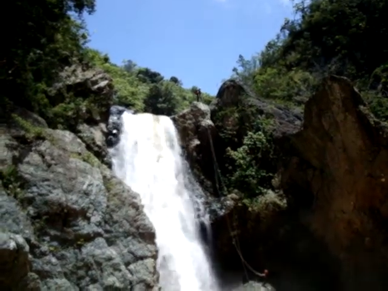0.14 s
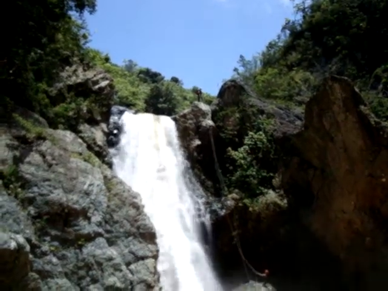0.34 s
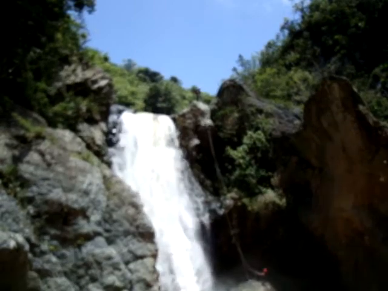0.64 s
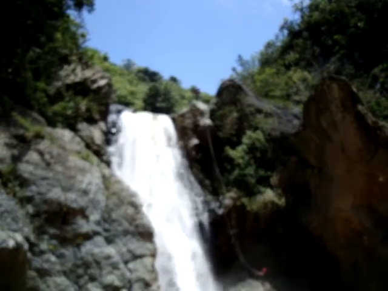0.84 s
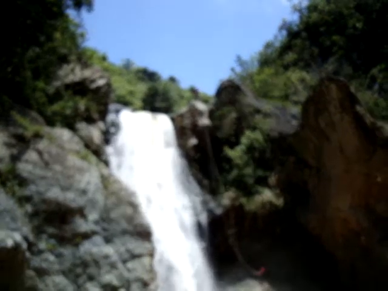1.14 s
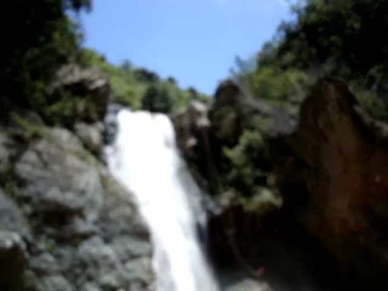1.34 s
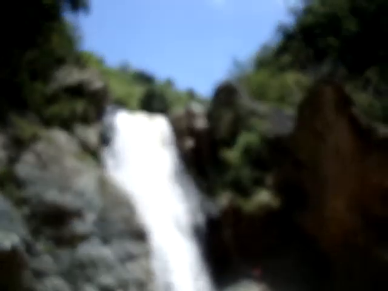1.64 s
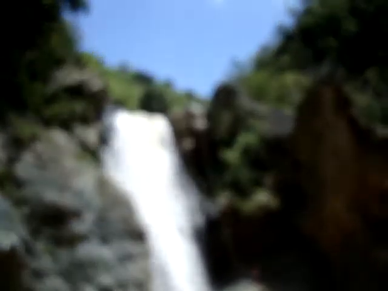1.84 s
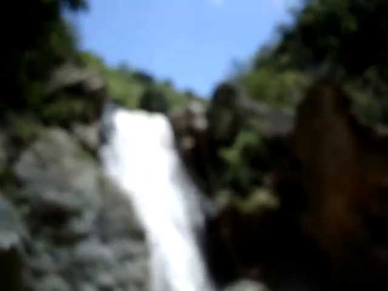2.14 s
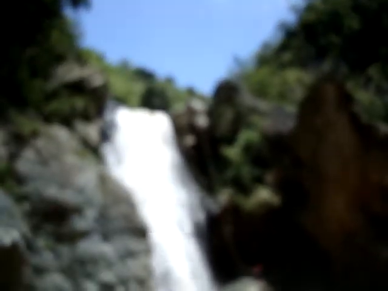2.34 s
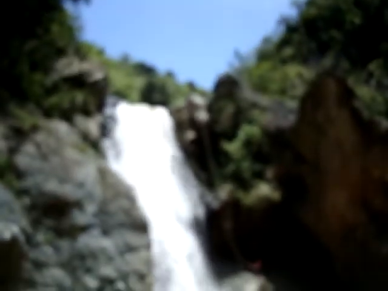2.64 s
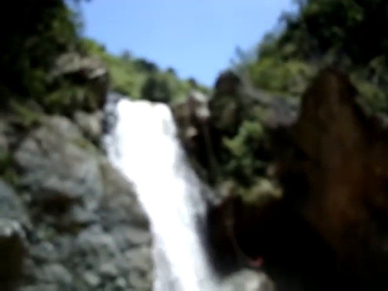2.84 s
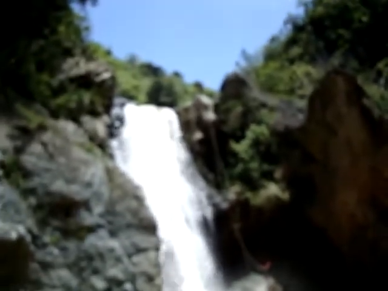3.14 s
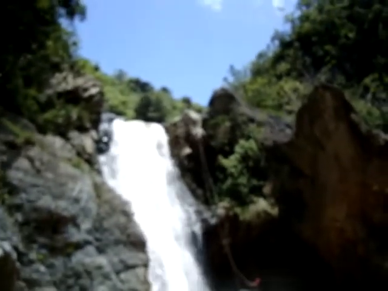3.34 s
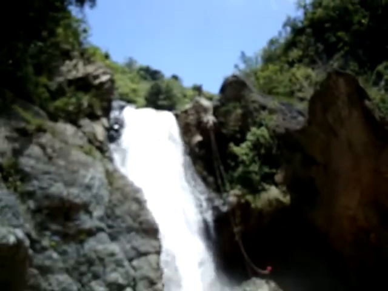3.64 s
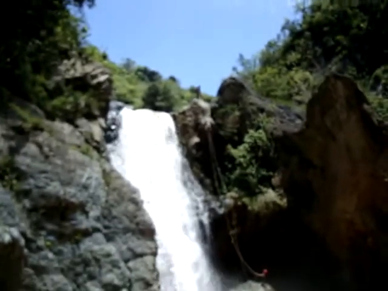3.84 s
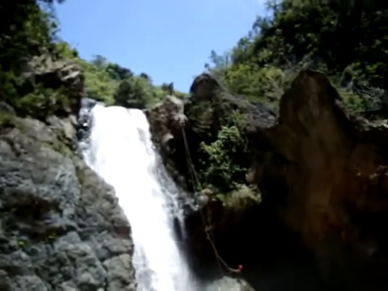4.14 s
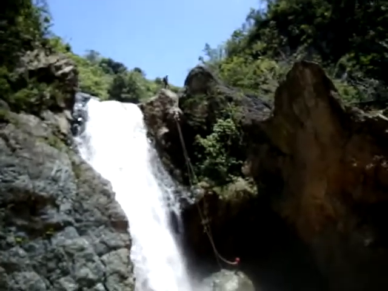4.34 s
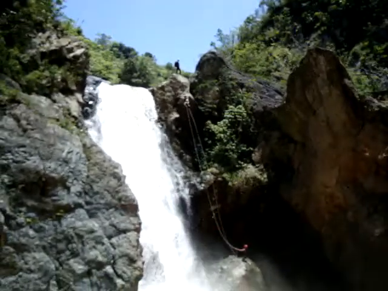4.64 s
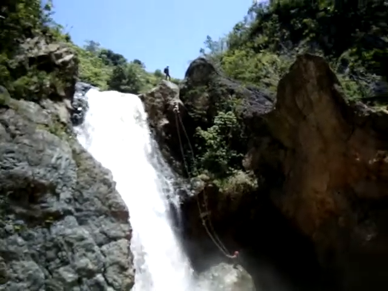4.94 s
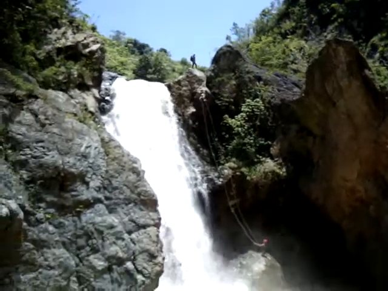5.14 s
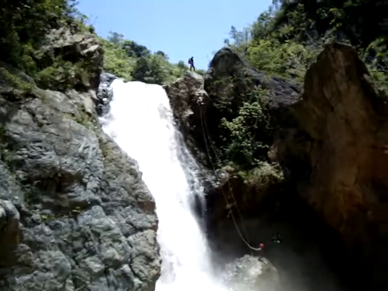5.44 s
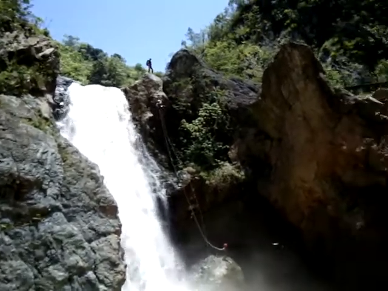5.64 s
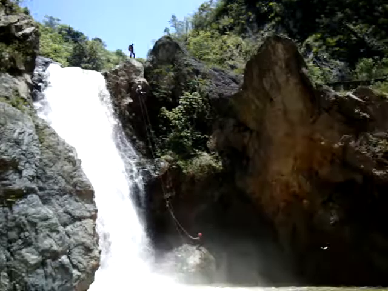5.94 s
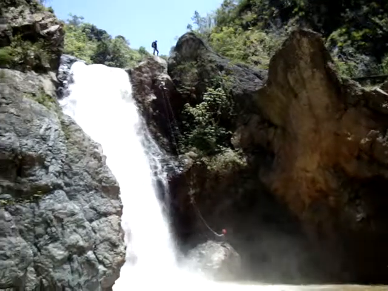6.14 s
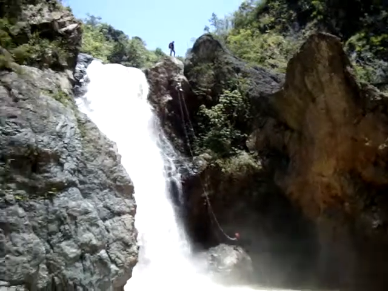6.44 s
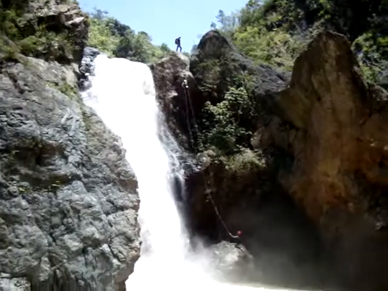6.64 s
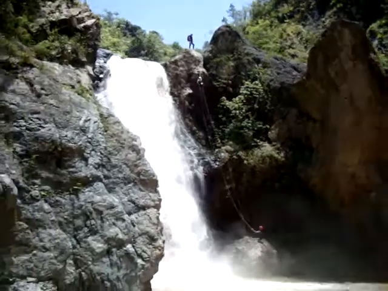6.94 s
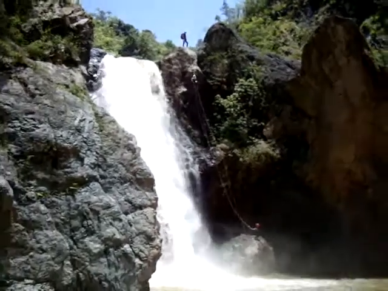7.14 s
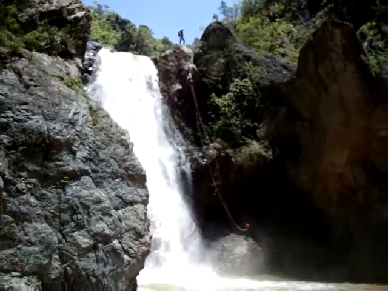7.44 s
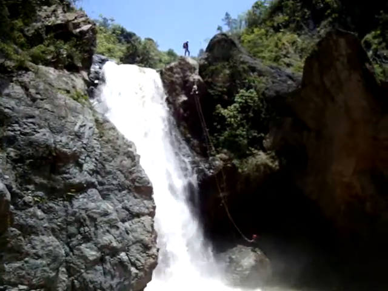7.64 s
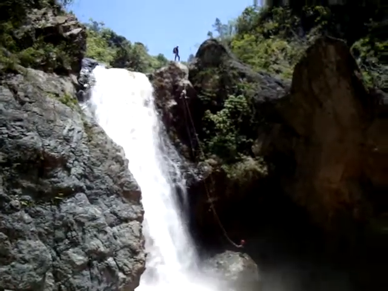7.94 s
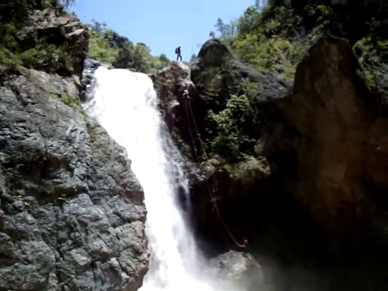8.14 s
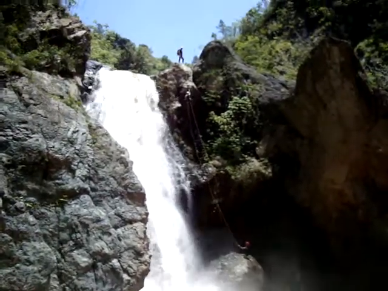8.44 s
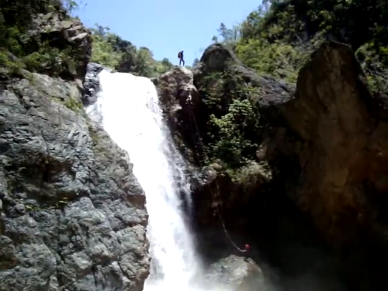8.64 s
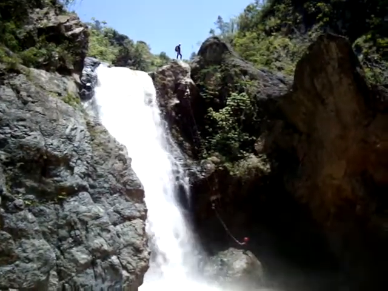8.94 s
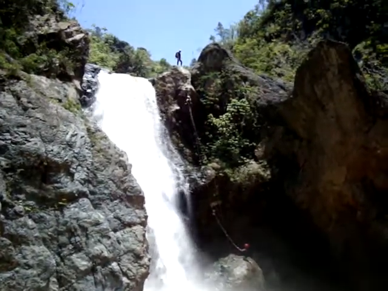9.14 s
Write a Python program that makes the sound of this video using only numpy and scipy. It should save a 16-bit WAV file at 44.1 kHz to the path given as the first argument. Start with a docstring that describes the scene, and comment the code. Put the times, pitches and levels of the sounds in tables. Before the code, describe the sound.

A tall waterfall pounds into a pool in a rock canyon, heard from the bank. A dense, very even roar of churning water fills the whole stretch, with soft bubbling inside it and a smooth bright hiss of spray on top. A faint deep rumble swells toward the middle, then ebbs. One tiny high peep sounds just after the middle. Both channels are alike, and the extreme treble is cut off.

```python
"""A tall waterfall plunges into a pool in a rock canyon, heard from the bank, alike in both channels.
Throughout, clouds of air driven under water roar: noise in octave bands that churn separately.
Single bubbles ring as short rising tones, and random drop clicks plus noise make the hiss of spray.
The flow is very even; a faint deep rumble of low noise swells until 5 s, ebbs until 7.8 s and grows again.
Near 5.5 s one tiny peep, a sine that falls slightly in pitch, sounds through."""
import sys
import numpy as np
from scipy import signal
from scipy.fft import rfft, irfft
from scipy.io import wavfile

SR = 44100
rng = np.random.default_rng(int(sys.argv[2]) if len(sys.argv) > 2 else 0)


def generate_wav(sig):
    """Save sig (samples, or channels by samples) to the path in sys.argv[1] as 16-bit PCM at SR."""
    pcm = np.round(np.clip(np.atleast_2d(sig).T, -1, 1) * 32767).astype(np.int16)
    wavfile.write(sys.argv[1], SR, pcm)


N = 409688  # length in samples, about 9.29 s


def undb(db):
    """Turn decibels into a gain."""
    return 10 ** (np.asarray(db) / 20)


def unit(x):
    """Scale a sound to an average strength (rms) of 1."""
    return x / np.sqrt(np.mean(x ** 2))


def curve(rows):
    """Join rows of (t/s, value) by straight lines, one value per sample."""
    times, values = np.transpose(rows)
    return np.interp(np.arange(N) / SR, times, values)


def bins():
    """Give the frequency of each spectral bin in Hz, at least 1 so that its logarithm exists."""
    return np.maximum(np.arange(N // 2 + 1) * SR / N, 1)


def colour(x, points):
    """Shape the tone by (f/Hz, level/dB) points, joined on a log-frequency axis."""
    hz, db = np.transpose(points)
    level_db = np.interp(np.log(bins()), np.log(hz), db)
    return irfft(rfft(x) * undb(level_db), N)


def cut(x, hz, kind, order):
    """Smoothly remove what lies above (kind "low") or below (kind "high") a frequency."""
    return signal.sosfilt(signal.butter(order, hz, kind, fs=SR, output="sos"), x)


def walk(rate):
    """Wander smoothly by chance with rms 1, changing about rate times a second."""
    spectrum = rfft(rng.standard_normal(N))
    slow = spectrum * np.exp(-(bins() / rate) ** 2)
    return unit(irfft(slow, N))


def rumble(low_hz=52, high_hz=90):
    """The largest air pockets heave in the pool: a narrow band of deep noise that swells and ebbs."""
    # Level of the deep rumble over time: t/s, level/dB
    rumble_level = [(0, -56.5), (3, -56.5), (5, -50.5), (7.8, -60), (9.29, -55)]
    heave = cut(rng.standard_normal(N), low_hz, "high", order=3)
    heave = unit(cut(heave, high_hz, "low", order=4))
    return heave * undb(curve(rumble_level))


def peep(at_s=5.49, start_hz=6350, end_hz=6230, fall_s=.012, attack_s=.005, decay_s=.02, level_db=-19):
    """One thin, high peep, perhaps a small bird: a sine that slides down, swells and fades."""
    t = np.maximum(np.arange(N) / SR - at_s, 0)  # time since the peep began
    hz = end_hz + (start_hz - end_hz) * np.exp(-t / fall_s)
    swell = (1 - np.exp(-t / attack_s)) * np.exp(-t / decay_s)
    tone = np.sin(2 * np.pi * np.cumsum(hz) / SR)
    return undb(level_db) * swell * tone  # the swell keeps the peak below level_db


def spray(drops_per_s=12000, range_db=18, far_db=2, flutter_db=0.38, flutter_hz=14, edge_hz=1800):
    """Near drops tick on water and rock; far ones and their echoes off the walls blur into smooth hiss."""
    # Tone colour of the spray: f/Hz, level/dB
    spray_colour = [(880, -31), (1500, 2), (1930, -2), (3390, -2), (5480, -6.5), (9800, -14), (12700, -42),
                    (21600, -120)]
    lands = rng.random(N) < drops_per_s / SR  # true at each sample where a drop lands
    sign = rng.choice([-1, 1], N)
    strength = undb(-range_db * rng.random(N))
    near = unit(lands * sign * strength)
    far = undb(far_db) * rng.standard_normal(N)  # far_db is relative to the near drops
    hiss = cut(colour(near + far, spray_colour), edge_hz, "high", order=5)
    return unit(hiss) * undb(flutter_db * walk(flutter_hz))


def bubbles(count=6000, low_hz=440, high_hz=1450, cycles=16, glide=0.099, range_db=14):
    """Single bubbles ring at the surface, rising in pitch as they fade."""
    out = np.zeros(N + SR)  # spare room for the last rings
    for when, pitch, depth in rng.random((count, 3)):
        hz = low_hz * (high_hz / low_hz) ** pitch
        length = min(int(cycles / hz * SR), SR)
        t = np.arange(length) / SR
        age = t * hz / cycles  # 0 at the start, about 1 at the end
        tone = np.sin(2 * np.pi * hz * t * (1 + glide * age / 2))
        fade = np.exp(-np.log(100) * age)  # down by 40 dB at age 1
        start = int(when * N)
        out[start:start + length] += tone * fade * undb(-range_db * depth)
    return unit(cut(out[:N], low_hz / 2, "high", order=2))  # small bubbles radiate no bass


def plunge(churn_db=0.4, churn_hz=12, low_hz=92, edge_hz=1800):
    """Bubble clouds of every size pulse under the jet; each octave of sizes churns by itself."""
    # Tone colour of the plunge: f/Hz, level/dB
    plunge_colour = [(53, -45), (90, -13.5), (150, -7), (242, -2.5), (381, -2.5), (567, 0.5), (917, -0.5),
                     (1080, -2.5), (1420, -2.5), (1930, -10.5), (2400, -6.5), (3120, -33), (5280, -120)]
    clouds = rfft(rng.standard_normal(N))
    octave = np.clip(np.log2(bins() / 100), 0, 4)  # octaves above 100 Hz; the end bands take the rest
    roar = 0
    for k in range(5):
        share = np.maximum(1 - abs(octave - k), 0)  # neighbouring bands overlap
        band = irfft(clouds * share, N)
        roar = roar + band * undb(churn_db * walk(churn_hz))
    roar = cut(colour(roar, plunge_colour), low_hz, "high", order=4)
    return unit(cut(roar, edge_hz, "low", order=5))


def scene(plunge_db=-23, spray_db=-21.5, bubble_db=-14, surge_db=0.06, surge_per_s=.7):
    """Steady roar and hiss surge slightly with the flow, over the deep rumble; both channels are alike."""
    flow = undb(surge_db * walk(surge_per_s))  # slow chance surging shared by roar and hiss
    deep = rumble()
    hiss = spray() * undb(spray_db)
    # bubble_db is relative to the plunge; plunge_db sets the two together
    roar = unit(plunge() + undb(bubble_db) * bubbles()) * undb(plunge_db)
    return np.tile(flow * (roar + hiss) + deep + peep(), (2, 1))


def record(dry, top_hz=10030):
    """The recorder cuts the top steeply: a low-pass with 0.1 dB ripple, 75 dB down beyond its edge."""
    return signal.sosfilt(signal.ellip(14, .1, 75, top_hz, fs=SR, output="sos"), dry)


dry = scene()
out = record(dry)
generate_wav(out)
```